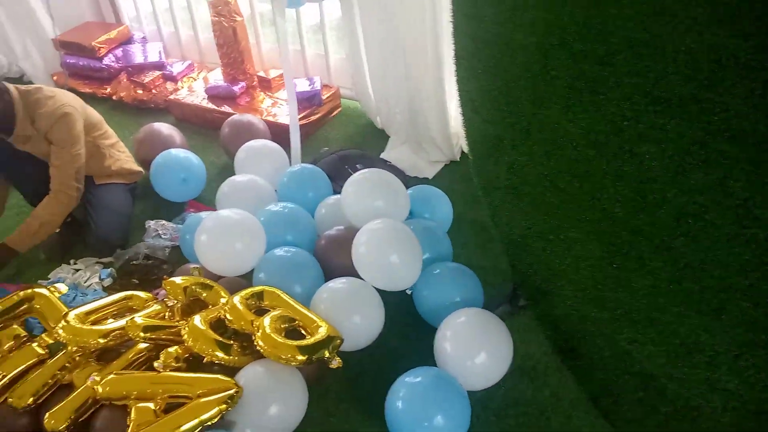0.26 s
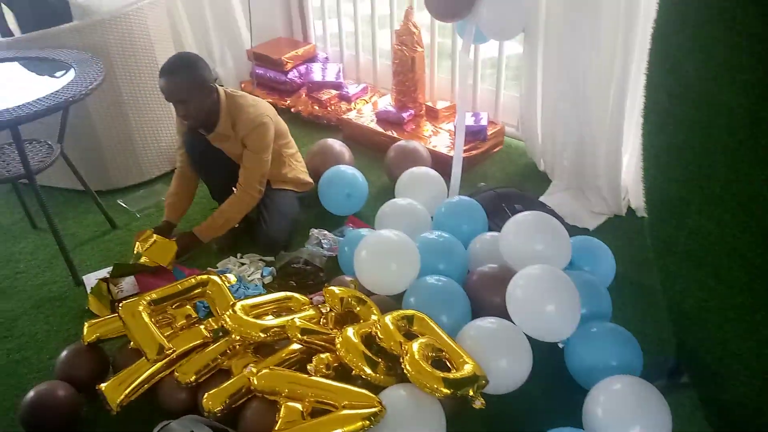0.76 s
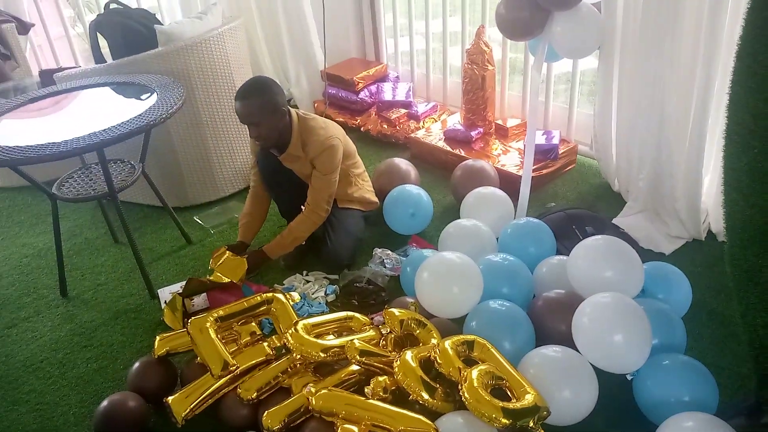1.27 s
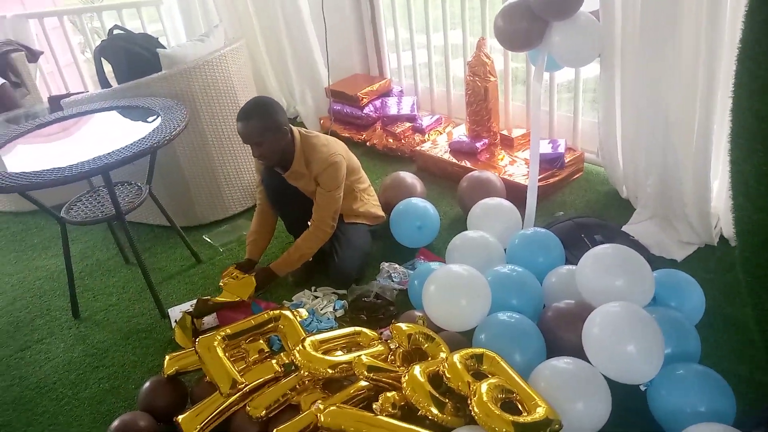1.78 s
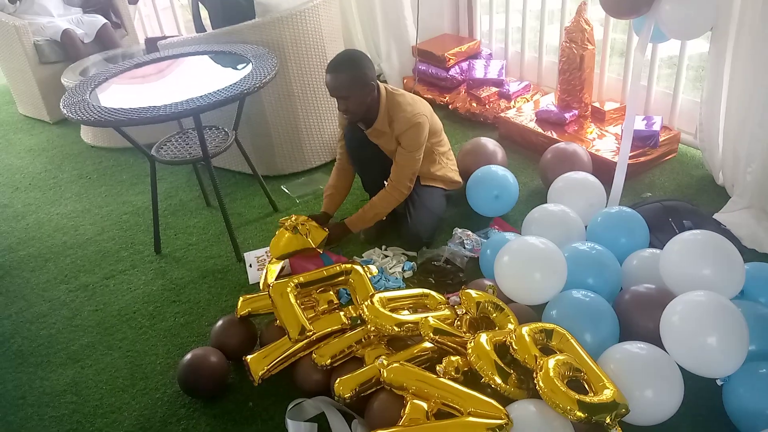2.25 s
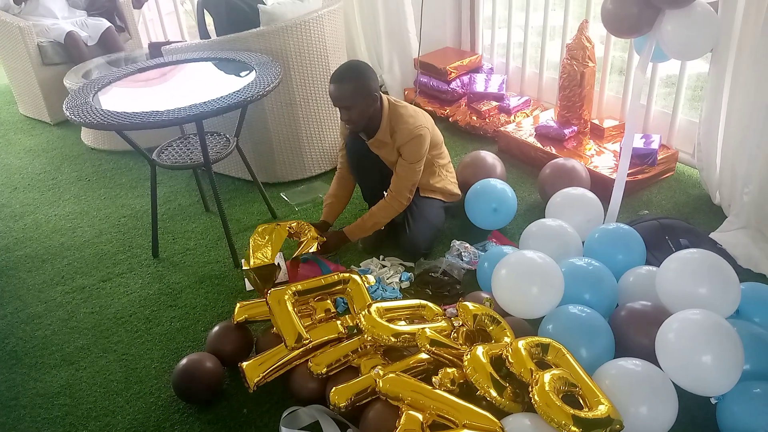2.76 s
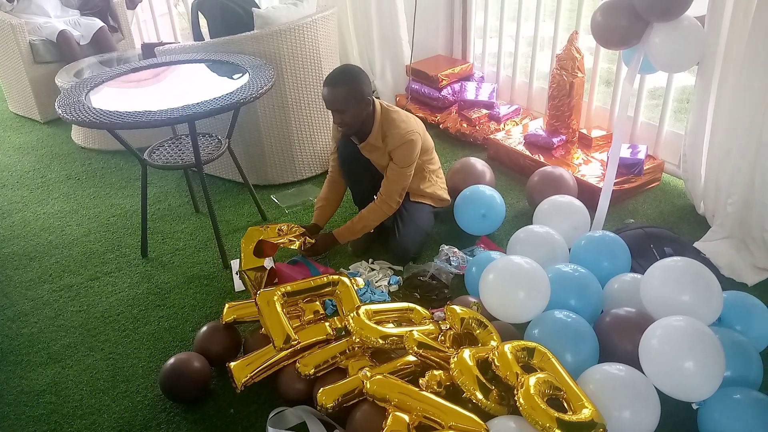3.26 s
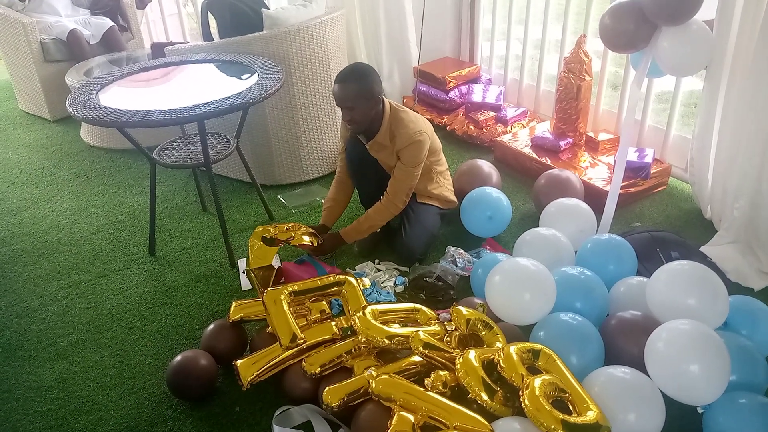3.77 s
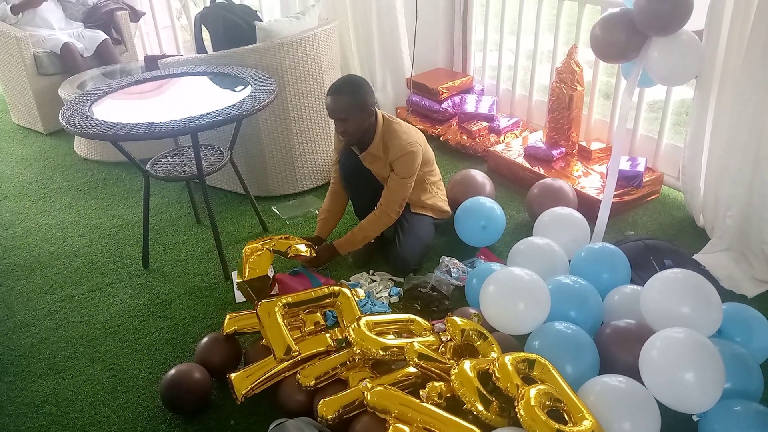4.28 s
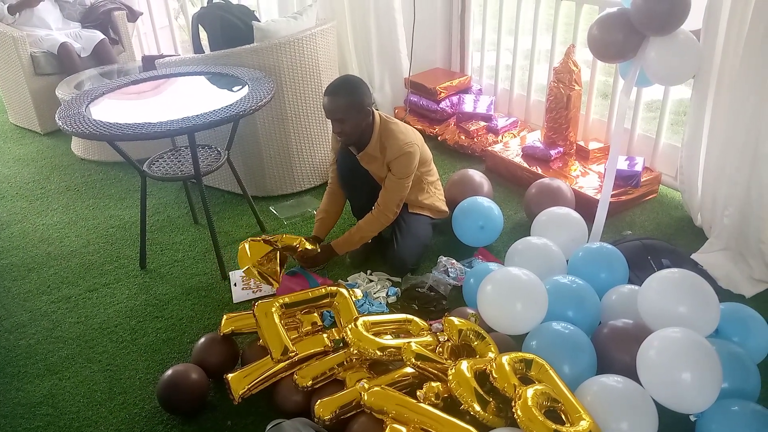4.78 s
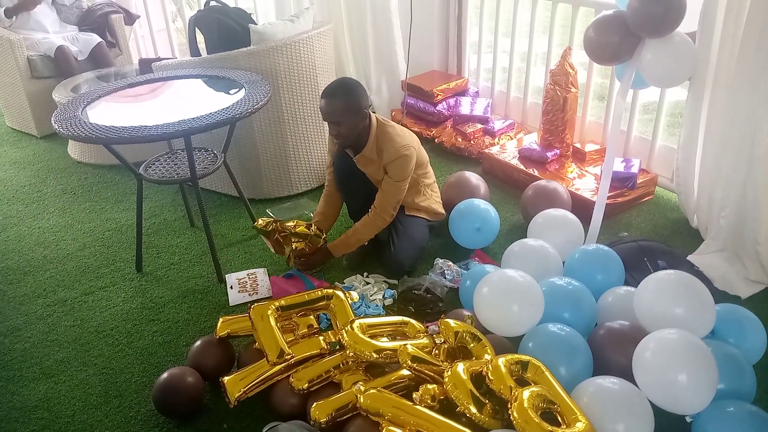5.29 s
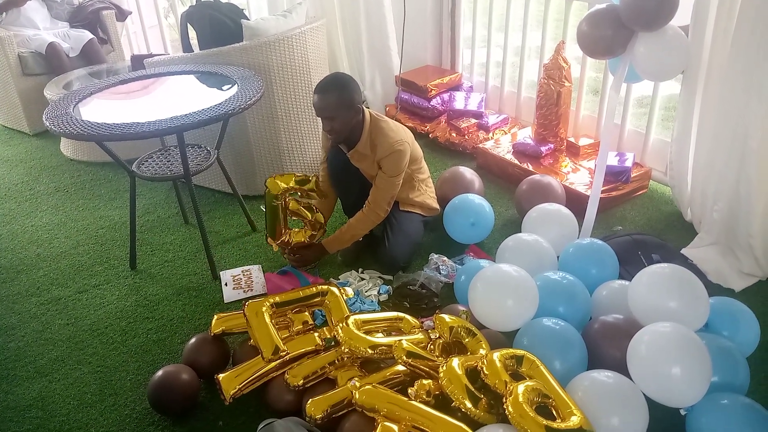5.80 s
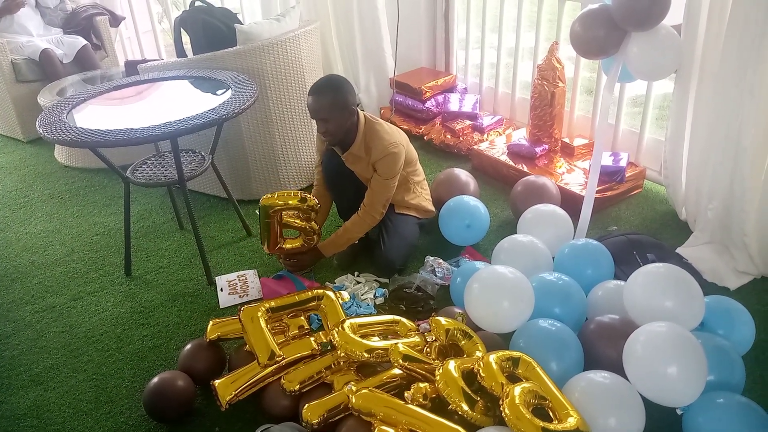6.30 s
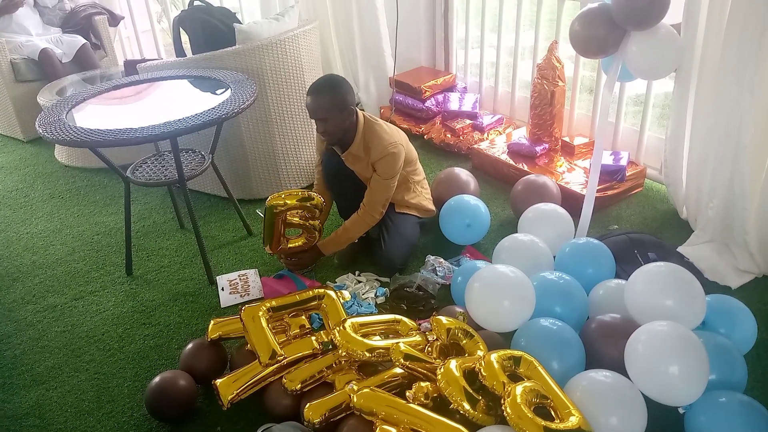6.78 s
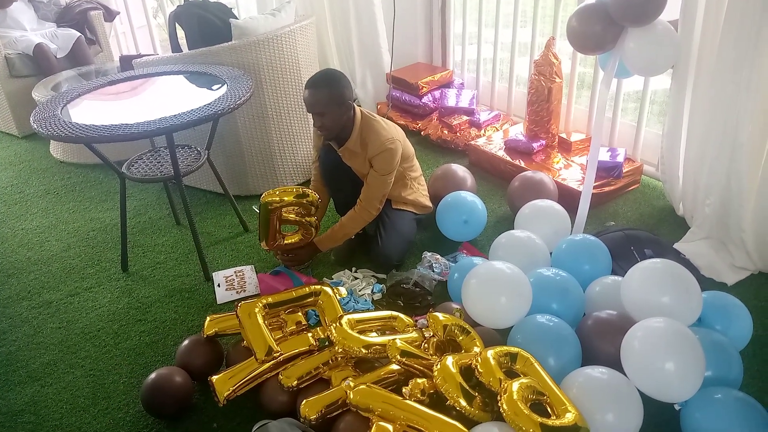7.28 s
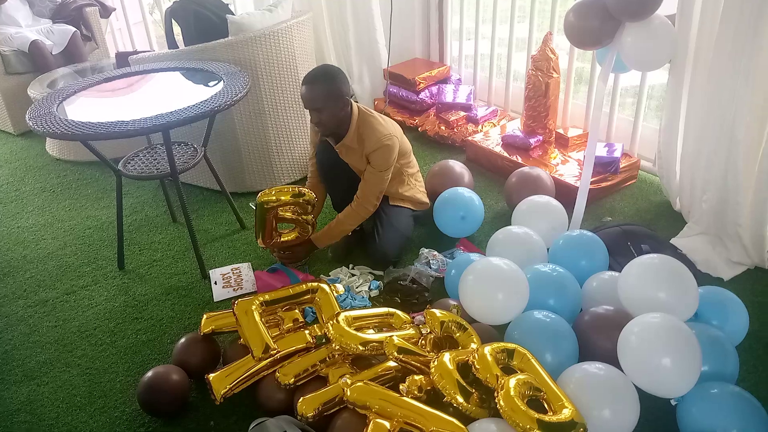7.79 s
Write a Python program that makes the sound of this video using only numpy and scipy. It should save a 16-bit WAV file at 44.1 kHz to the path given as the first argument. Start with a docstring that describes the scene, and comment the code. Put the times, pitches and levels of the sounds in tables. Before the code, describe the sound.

For the first second, foil rustles and crinkles faintly in a quiet carpeted room, while fingers bump softly against the handheld microphone. At about 1 second an electric pump a few metres away is nudged on, giving a small puff of air and a rattle of foil. At 1.3 seconds it spins up with a brief rough buzz, rising to a steady hum and high whine over loud roaring, hissing air. Around 2.4 seconds the balloon's neck gives one short rising squeal. The pump runs evenly until about 4.9 seconds, when the foil crinkles and the motor coasts, dropping in pitch and level. At 5.4 seconds it speeds up again and holds its whine. From about 6.8 seconds it winds down, the tone falling and the air fading toward 8 seconds.

```python
"""Electric pump filling a foil balloon

In a carpeted room, a few metres from a handheld camera, foil rustles and the nozzle switch is nudged.
The blower runs up, coasts, is pressed again and runs down. Its rotor hums, its blades whine, and air
roars through the plastic casing, hisses out of the nozzle and squeals once in the balloon's neck."""
import sys
import numpy as np
from scipy import signal
from scipy.fft import rfft, irfft, next_fast_len
from scipy.io import wavfile
from scipy.ndimage import uniform_filter1d, map_coordinates

SR = 44100
rng = np.random.default_rng(int(sys.argv[2]) if len(sys.argv) > 2 else 0)


def unload_wav(signal):
    """Save mono or channel-first audio to the path in sys.argv[1] as 16-bit WAV at rate SR, clipped to [-1, 1]."""
    wavfile.write(
        sys.argv[1],
        SR,
        np.round(np.clip(np.atleast_2d(signal).T, -1, 1) * 32767).astype(np.int16),
    )


N = 354986

BLADES, COMMUTATOR_BARS, TOP_SPEED_HZ = 14, 24, 397.9
# what drives and brakes the rotor, in turns per second per second
STALL_PULL, AIR_DRAG, FRICTION, BACK_PRESSURE = 2365, 259.4, 14.4, 4.5
PULL_KNEE = .4274  # share of top speed around which the pull fades
UNFOLD_START_S, UNFOLD_END_S = 2.9, 5.2  # the unfolding balloon gives no back pressure

# room tone: freq_hz, gain_db
ROOM_TONE_EQ = [(25, -18), (50, -6), (88, 2), (150, -8), (300, -15.5), (900, -18), (1700, -16), (4000, -29),
                (8000, -34), (15000, -48)]
# reverb time of the room: freq_hz, t60_s
ROOM_DECAY = [(200, 0.62), (2000, 0.58), (12000, 0.17)]
# hands smooth out the foil: centre_s, level_db, half_width_s
FOIL_STROKES = [(0.083, -74, 0.054), (0.38, -65.5, 0.19), (0.78, -86, 0.11)]
# the foil crinkles: start_s, level_db, decay_s
FOIL_CRINKLES = [(0.008, -68, 0.028), (0.051, -65, 0.027), (0.1, -68, 0.03), (0.186, -58, 0.028),
                 (0.385, -55, 0.013), (0.588, -73, 0.027), (0.783, -90, 0.059), (4.795, -37, 0.03),
                 (4.863, -53, 0.05)]
# colour of handled foil: freq_hz, gain_db
RUSTLE_EQ = [(180, -34), (300, -20), (700, -21), (1100, -17), (1750, -2.5), (2500, -7), (3100, -4),
             (4500, -2.5), (5600, -4), (7200, -2.5), (9500, -26), (13500, -34), (15500, -22)]
# resonances of the foil sheet: freq_hz, width_hz, boost_db
FOIL_MODES = [(900, 81, 9), (1390, 120, 2), (1680, 190, 6), (2250, 100, 6), (2620, 250, 1.5),
              (3100, 200, 6), (3820, 200, 7), (4500, 220, 3), (5400, 250, 3), (5570, 300, -3),
              (6200, 400, 4)]
# fingers bump the camera: centre_s, level_db, half_width_s
FINGER_BUMPS = [(0.02, -72, 0.02), (0.16, -74, 0.03), (0.287, -67, 0.022), (0.352, -61, 0.03),
                (0.464, -64, 0.018), (0.583, -71, 0.03)]
# their low thud: freq_hz, gain_db
BUMP_EQ = [(20, -26), (45, -5), (80, 4), (110, -7), (180, -21), (400, -45), (1500, -54)]
# the switch is held down: start_s, end_s, contact (0-1)
PRESSES = [(1.0265, 1.101, .34), (1.2555, 1.2635, .85), (1.2725, 4.865, 1), (5.369, 6.752, 1)]
# the first puff of air: freq_hz, gain_db
PUFF_EQ = [(100, -29), (250, -2), (450, 1), (750, 5.5), (1300, -2), (1850, -11), (2300, -24), (2650, -15),
           (3000, -40), (6000, -36), (15000, -48)]
# colour of rattling foil: freq_hz, gain_db
RATTLE_EQ = [(900, -28), (1700, -4), (2350, 13), (3000, -19), (3700, 1), (4200, -6), (4750, -1), (5400, 3),
             (6200, -10), (6900, -26), (15000, -24)]
# casing and room peaks and dips that the hum glides through: freq_hz, width_hz, boost_db
HUM_RESONANCES = [(100, 150, -19), (417, 62, -6), (502, 22, 10.5), (575, 30, -4), (677.5, 60, 11.5),
                  (743, 14, 7.5), (764, 13, 12), (755, 13, 1.5), (796, 8.4, 12.5)]
# the same for the whine: freq_hz, width_hz, boost_db
WHINE_RESONANCES = [(2950, 220, -6), (3230, 120, 10), (3630, 200, -6), (3970, 150, 3), (4150, 220, -3),
                    (4720, 300, 6), (4970, 98, -12), (5220, 150, 4), (5397, 120, 4.5), (5485, 54, -3),
                    (5520, 54, 1.5)]
# body of the air in the casing: freq_hz, gain_db
ROAR_EQ = [(25, -40), (40, -44), (70, -17), (120, -12), (190, -15.5), (310, -7), (400, -9.5), (460, -8.5),
           (560, -2), (700, 3), (930, -1.5), (1030, -10.5), (1450, -21), (3200, -27.5), (7000, -35),
           (12000, -54)]
# midrange rush of the nozzle: freq_hz, gain_db
RUSH_EQ = [(300, -40), (900, 2), (1150, -1), (1450, -3.5), (1700, -1.5), (2350, 2.5), (2900, -5),
           (3500, -10), (5000, -12.5), (9000, -22)]
# bright hiss on top: freq_hz, gain_db
HISS_EQ = [(1500, -20.5), (3000, -7), (3500, 2), (4300, 1), (5200, 6), (5900, 3), (6600, 0), (7400, -2.5),
           (8200, -11), (10500, -15), (13900, -20), (14700, -2.5), (15100, -12), (15700, -2.5)]
# resonances of the casing and its ducts: freq_hz, width_hz, boost_db
CASING_MODES = [(328.4, 9.9, 6.5), (374.2, 14, 7), (463, 23, -5.5), (505.5, 7.8, 7.5), (535, 15, -5),
                (651, 16, 5), (686.2, 21, 8.5), (710, 31, -5.5), (770, 8.5, 7), (790, 29, 2),
                (898, 15.4, 8), (934, 14, 10.5), (974, 16, 14.5), (954, 110, -4), (1117, 15, 5),
                (1286, 15, 7.5), (1443, 80, -2.5), (1594, 15, 7.5), (1870, 31, 7), (1915, 20, 5.5),
                (3207, 120, 7), (4190, 82, 7), (4920, 99, 1.5), (6516, 300, 6.5), (9100, 130, 5.5),
                (12300, 560, 4.5)]
# the rush and hiss briefly swell or dip: centre_s, half_width_s, rush_boost_db, hiss_boost_db
AIR_SWELLS = [(1.685, 0.13, 0.5, -1.5), (4.0, 0.7, 1.4, 0.8), (4.865, 0.2, 3.8, 1.0), (5.5, 0.25, 2.3, 1.0),
              (6.035, 0.3, 1.1, 2.5)]
# resonances of the impeller chamber: freq_hz, width_hz, boost_db
CHAMBER_MODES = [(4840, 270, 18), (5350, 120, 5), (5170, 130, 11.5)]
# the neck's rising squeal: time_s, pitch_hz, level_db
SQUEAL_PATH = [(2.28, 1980, -68), (2.32, 2014, -52), (2.38, 2080, -38), (2.42, 2196, -43),
               (2.46, 2377, -48), (2.51, 2420, -42), (2.56, 2470, -46), (2.64, 2520, -60)]


def amp(db):
    """Decibels to gain."""
    return 10 ** (np.asarray(db) / 20)


def unit(x):
    """Scale to rms 1."""
    return x / np.sqrt(np.mean(x ** 2) + 1e-20)


def clock():
    """The time of each sample."""
    return np.arange(N) / SR


def along(points, hz):
    """Read (freq_hz, value) points on a log axis."""
    freqs, values = np.transpose(points)
    return np.interp(np.log(hz + 1), np.log(freqs + 1), values)


def gate(start, end, fade_s=0.013):
    """Fade in at start, fade out at end."""
    return np.clip((clock() - start) / fade_s, 0, 1) * np.clip((end - clock()) / fade_s + 1, 0, 1)


def swell(centre_s, half_width_s):
    """A bell-shaped envelope of height 1."""
    return np.exp(-np.minimum(((clock() - centre_s) / half_width_s) ** 2, 50))


def burst(start, db, attack_s, fall_db_per_s):
    """An envelope that rises at start and dies away."""
    age = np.maximum(clock() - start, 0)
    return amp(db - fall_db_per_s * age) * (1 - np.exp(-age / attack_s))


def wobble(rate):
    """Smooth random modulation, rate knots a second."""
    knots = rng.standard_normal(int(N * rate / SR) + 4)
    places = np.arange(0, len(knots), 1 / 8)
    return np.interp(clock() * rate, places, map_coordinates(knots, [places]))


def angle_of(hz):
    """Phase of something that turns at hz."""
    return 2 * np.pi * np.cumsum(hz) / SR


def filtered(x, response):
    """Equalise x with a gain curve over frequency."""
    size = next_fast_len(N + 8192)
    return irfft(rfft(x, size) * response(np.fft.rfftfreq(size, 1 / SR)), size)[:N]


def noise(eq):
    """Noise of rms 1, coloured by (freq_hz, gain_db) points."""
    return unit(filtered(rng.standard_normal(N), lambda hz: amp(along(eq, hz))))


def boost(modes, hz):
    """Gain of a set of resonances at hz."""
    return amp(sum(db / (1 + (2 * (hz - centre) / width) ** 2) for centre, width, db in modes))


def resonate(x, modes):
    """Colour x with resonances, at rms 1."""
    return unit(filtered(x, lambda hz: boost(modes, hz)))


def room(x, wet_db):
    """Blend in the short, dull tail of the carpeted room."""
    hz, t, bins = signal.stft(rng.standard_normal(SR // 2), SR, nperseg=256)
    decay = amp(-60 * t / along(ROOM_DECAY, hz)[:, None])
    tail = signal.istft(bins * decay, SR, nperseg=256)[1]
    wet = signal.fftconvolve(x, tail / np.linalg.norm(tail))[:N]
    return (x + amp(wet_db) * wet) / np.hypot(1, amp(wet_db))


def flexing(x, depth_db):
    """A flexing sheet keeps changing colour: patches of random gain in time and frequency."""
    bins = signal.stft(x, nperseg=512)[2]
    patches = uniform_filter1d(rng.standard_normal(bins.shape), size=4, axis=0)
    patches = uniform_filter1d(patches, size=14, axis=1)
    return unit(signal.istft(bins * amp(depth_db * unit(patches)), nperseg=512)[1][:N])


def foil_rustle():
    """Handled foil gives a grainy rustle, in soft strokes and sharp crinkles."""
    strokes = sum(amp(db) * swell(s, width) for s, db, width in FOIL_STROKES)
    crinkles = sum(amp(db) * np.clip((clock() - s) / 0.0097, 0, 1) * swell(s, decay)
                   for s, db, decay in FOIL_CRINKLES)
    grains = flexing(noise(RUSTLE_EQ), depth_db=4.5) * amp(1.7 * wobble(400))
    return (strokes + crinkles) * resonate(grains, FOIL_MODES)


def finger_bumps():
    """Fingers thud softly on the camera's body."""
    return sum(amp(db) * swell(s, width) for s, db, width in FINGER_BUMPS) * noise(BUMP_EQ)


def power():
    """How firmly the switch feeds the motor, 0-1."""
    return sum(contact * gate(on, off, fade_s=.005) for on, off, contact in PRESSES)


def shaft_speed():
    """Turns per second: the motor's pull fades as it speeds up; air drag and friction brake it."""
    step_s = .002
    times = np.arange(0, N / SR + step_s, step_s)
    loads = BACK_PRESSURE * ((times < UNFOLD_START_S) | (times > UNFOLD_END_S))
    speed, speeds = 0, []
    for powered, load in zip(np.interp(times, clock(), power()), loads):
        speeds.append(speed)
        pace = speed / TOP_SPEED_HZ
        pull = AIR_DRAG + FRICTION + STALL_PULL * (1 - pace) / (1 + pace / PULL_KNEE)
        speed = max(0, speed + step_s * (powered * (pull - load) - AIR_DRAG * pace ** 2 - FRICTION))
    return np.interp(clock(), times, speeds)


def nudge(speed):
    """The switch closes for an instant: a puff of air, a rattle of foil and a short rough whine."""
    start, next_press = PRESSES[0][0], PRESSES[1][0]
    phase = angle_of(2 * COMMUTATOR_BARS * speed) + 0.75 * wobble(460)
    rough_tone = amp(3 * wobble(98)) * (np.sin(phase) + amp(-4) * np.sin(2 * phase))
    whine = burst(start, db=-71, attack_s=0.087, fall_db_per_s=61) * rough_tone
    foil = resonate(flexing(noise(RATTLE_EQ), depth_db=4) * amp(3 * wobble(200)), FOIL_MODES)
    rattle = burst(start, db=-59.5, attack_s=0.06, fall_db_per_s=100) * foil
    puff = burst(start, db=-58, attack_s=0.017, fall_db_per_s=50) * noise(PUFF_EQ)
    return puff + rattle + whine * gate(start, next_press, fade_s=.003)


def rotor_hum(speed, turn, gliding):
    """The rotor hums at twice the shaft rate; the octave joins close to full speed."""
    pace = speed / TOP_SPEED_HZ
    ring_s = 0.033  # the resonances take time to fill and empty
    pole = np.exp(-1 / (ring_s * SR))
    gain = signal.lfilter([1 - pole], [1, -pole], pace ** 0.87 * boost(HUM_RESONANCES, 2 * speed))
    flutter_db = 1.1 * wobble(24) + gliding * (3.5 * wobble(22) - 1.5)
    hum = gain * amp(-48 + flutter_db) * np.sin(2 * turn + .95 * gliding * wobble(36))
    near_top = np.clip((pace - .955) / .025, 0, 1)
    return hum + amp(-54.5 + 2.5 * wobble(12)) * near_top * np.sin(4 * turn)


def blade_whine(speed, turn, gliding):
    """The passing blades sing a high tone that grows steeply with speed."""
    gain = (speed / TOP_SPEED_HZ) ** 4.2 * boost(WHINE_RESONANCES, BLADES * speed)
    flutter_db = 1.1 * wobble(60) + gliding * (2.8 * wobble(35) - .3)
    return gain * amp(-41 + flutter_db) * np.sin(BLADES * turn + .1 * wobble(250))


def brush_buzz(pace, turn):
    """Brushes chatter on the commutator bars: a rough buzz while current flows."""
    current = 1 - 0.88 * pace  # greatest at standstill
    phase = COMMUTATOR_BARS * turn + 0.9 * wobble(700)
    buzz = np.sin(phase) + amp(-8) * np.sin(2 * phase)
    return amp(-31 + 4.4 * wobble(160)) * power() * current ** 3.1 * pace ** 1.7 * buzz


def mains_hum(pace):
    """The field coils hum, most during the run-up from rest."""
    surge = 1 + 3.8 * np.exp(-np.abs(clock() - PRESSES[1][0]) / 0.88)
    gain = amp(-69.5 + 1.5 * wobble(4)) * power() * pace * surge
    return gain * np.sin(angle_of(100 + .4 * wobble(6)))


def motor(speed):
    """The blower's tonal layers, their top end softened by the plastic shell."""
    pace = speed / TOP_SPEED_HZ
    turn = angle_of(speed * (1 + 0.00049 * wobble(25)))
    # a gliding tone swells and breaks up as it crosses the room's standing waves
    glide_rate = uniform_filter1d(np.gradient(np.log(speed + 1)) * SR, size=4000)
    gliding = np.tanh(np.abs(glide_rate) / .3)
    tones = rotor_hum(speed, turn, gliding) + blade_whine(speed, turn, gliding)
    tones += brush_buzz(pace, turn) + mains_hum(pace)
    return filtered(np.sqrt(2) * tones, lambda hz: 1 / np.hypot(1, (hz / 6600) ** 10))


def flow_db(pace, ceiling_db, knee):
    """Flow noise power grows with the sixth power of speed, then levels off past the knee."""
    return ceiling_db - 10 * np.log10(1 + (knee / (pace + 1e-3)) ** 6)


def airflow(speed):
    """Turbulence roars in the casing and rushes and hisses out of the nozzle."""
    pace = speed / TOP_SPEED_HZ
    roar_db = flow_db(pace, ceiling_db=-36, knee=0.65)
    rush_db = flow_db(pace, ceiling_db=-38.5, knee=0.95)
    hiss_db = flow_db(pace, ceiling_db=-33.5, knee=0.96)
    for s, width, rush_boost_db, hiss_boost_db in AIR_SWELLS:
        rush_db += rush_boost_db * swell(s, width)
        hiss_db += hiss_boost_db * swell(s, width)
    roar = amp(roar_db + 0.1 * wobble(12)) * resonate(noise(ROAR_EQ), CASING_MODES)
    rush = amp(rush_db + 0.51 * wobble(20)) * resonate(noise(RUSH_EQ), CASING_MODES)
    hiss = amp(hiss_db + 0.5 * wobble(22)) * resonate(noise(HISS_EQ), CASING_MODES)
    # one shell mode rings along with the roar
    shimmer = noise([(20, 8), (35, 1), (100, -13), (600, -63)])
    ring = amp(roar_db - 20) * shimmer * np.sin(angle_of(np.full(N, 3205)))
    return roar + rush + hiss + ring


def blade_wakes(speed):
    """Eddies behind the blades make a band of noise that rides just under the whine."""
    eddies = noise([(20, -9), (350, 23), (700, 8), (1500, -37)])
    band = eddies * np.sin(angle_of(.9 * BLADES * speed))
    return amp(-43) * (speed / TOP_SPEED_HZ) ** 5 * resonate(band, CHAMBER_MODES)


def neck_squeal():
    """Air whistles through the foil neck in one short upward slide."""
    times, pitches, levels = np.transpose(SQUEAL_PATH)
    db = np.interp(clock(), times, levels) + 2 * wobble(60)
    hz = np.interp(clock(), times, pitches) * (1 + 0.0053 * wobble(150))
    return amp(db) * np.sin(angle_of(hz)) * gate(times[0], times[-1])


def scene():
    """Pump and balloon over a bed of room tone, alike in both channels."""
    speed = shaft_speed()
    details = room(foil_rustle() + finger_bumps() + nudge(speed) + neck_squeal(), wet_db=-10.5)
    blower = room(motor(speed), wet_db=-20) + airflow(speed) + blade_wakes(speed)
    mono = details + blower + amp(-81) * noise(ROOM_TONE_EQ)
    return np.array([mono, mono])


def record(dry):
    """A steep low-pass at the camera's band limit."""
    top_hz = 15750
    return np.array([filtered(side, lambda hz: 1 / np.hypot(1, (hz / top_hz) ** 300)) for side in dry])


dry = scene()
out = record(dry)
unload_wav(out)
```